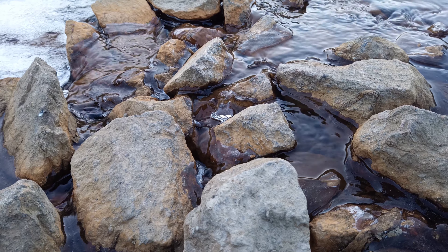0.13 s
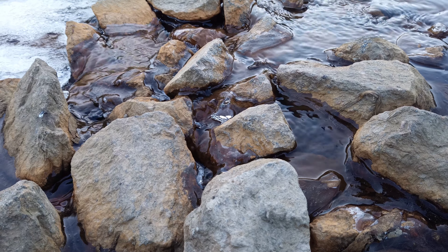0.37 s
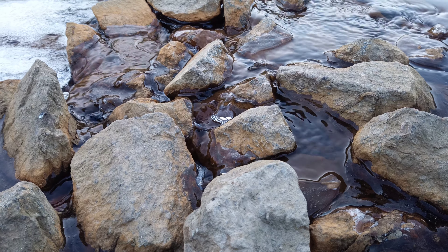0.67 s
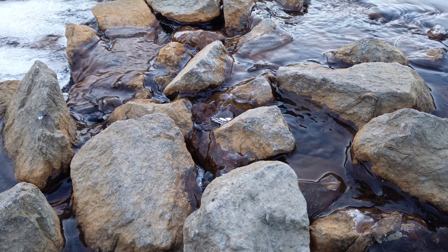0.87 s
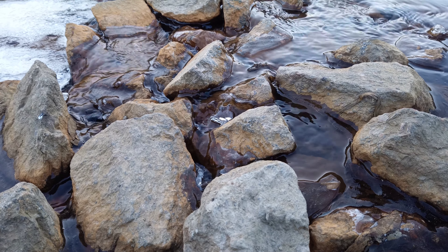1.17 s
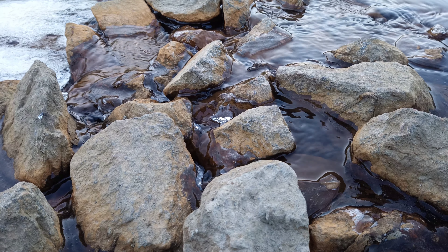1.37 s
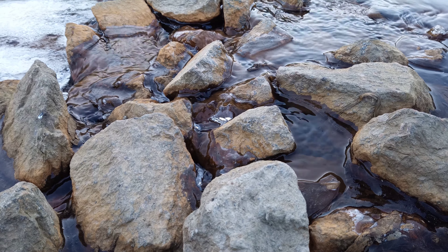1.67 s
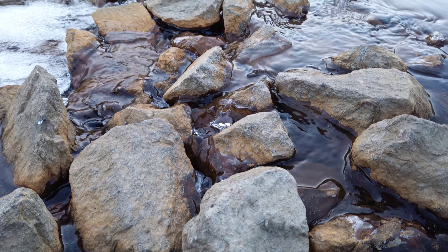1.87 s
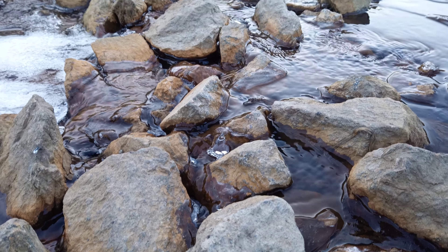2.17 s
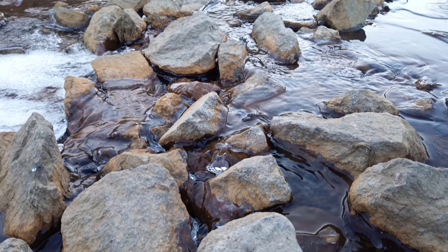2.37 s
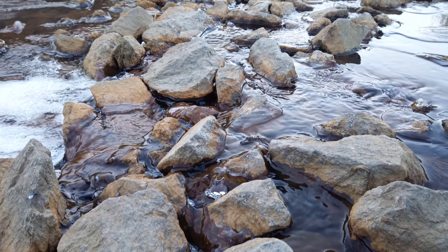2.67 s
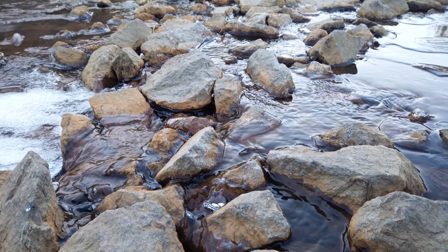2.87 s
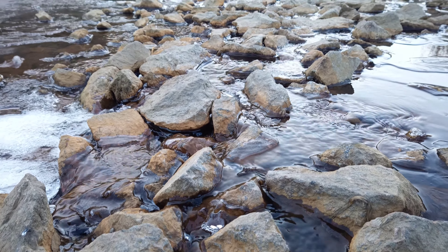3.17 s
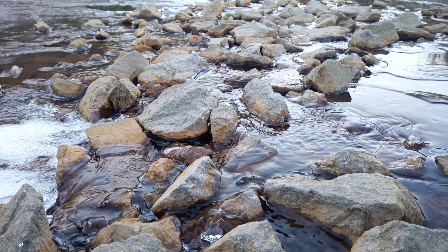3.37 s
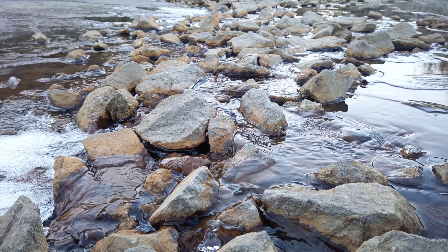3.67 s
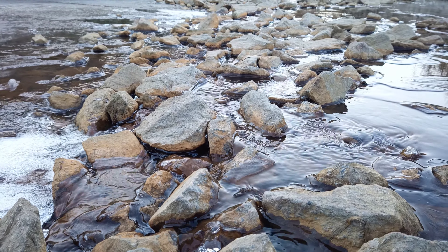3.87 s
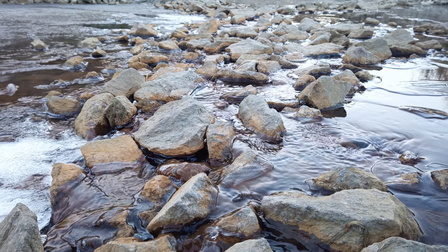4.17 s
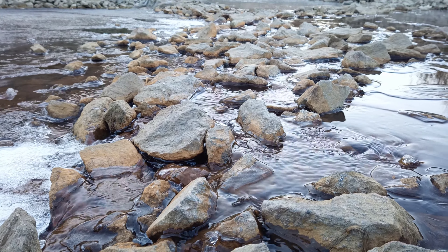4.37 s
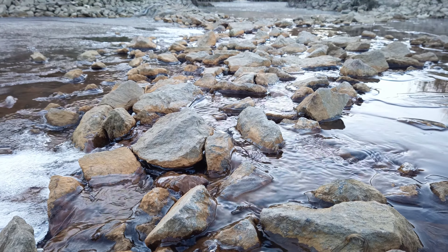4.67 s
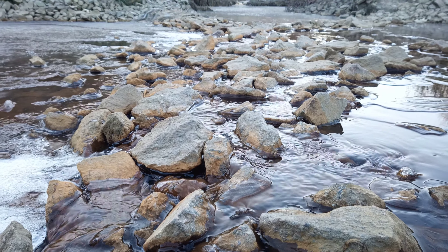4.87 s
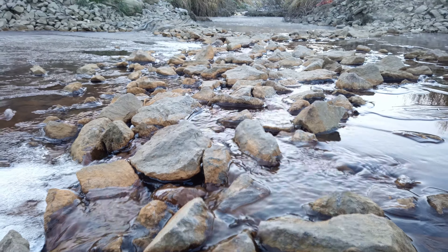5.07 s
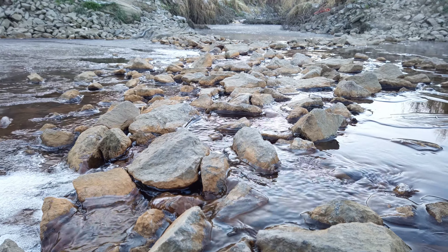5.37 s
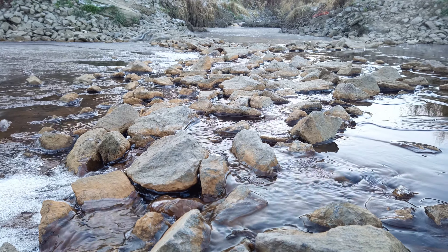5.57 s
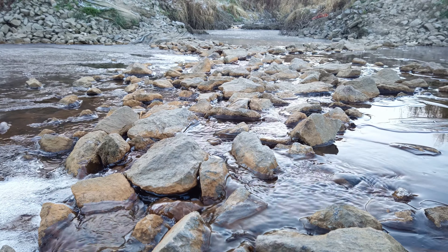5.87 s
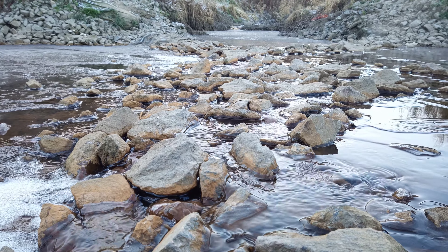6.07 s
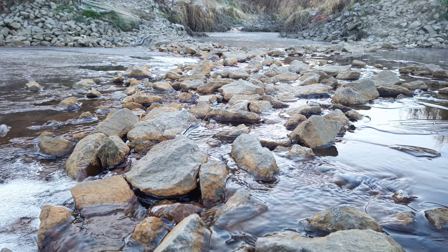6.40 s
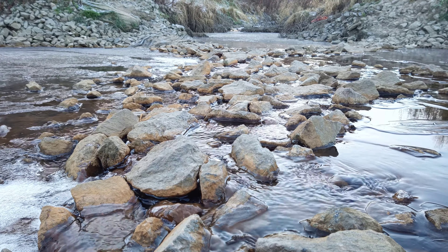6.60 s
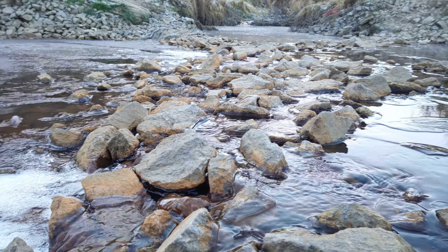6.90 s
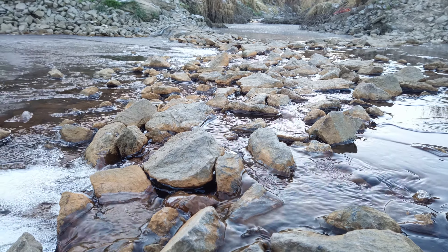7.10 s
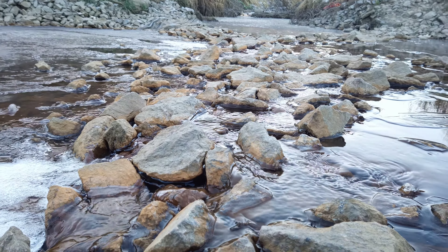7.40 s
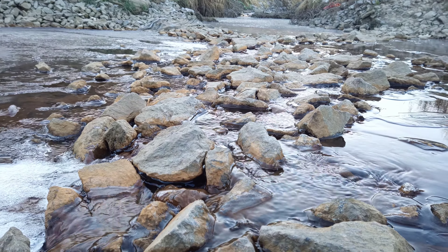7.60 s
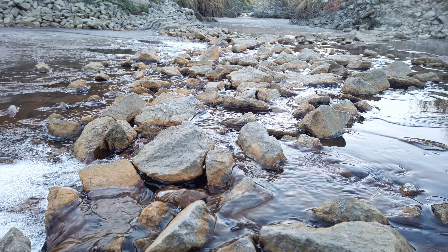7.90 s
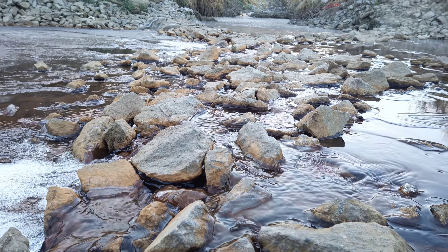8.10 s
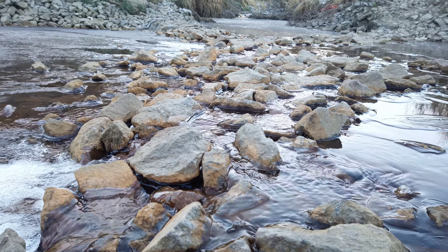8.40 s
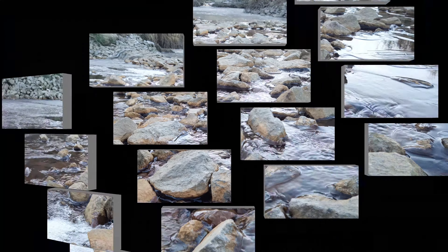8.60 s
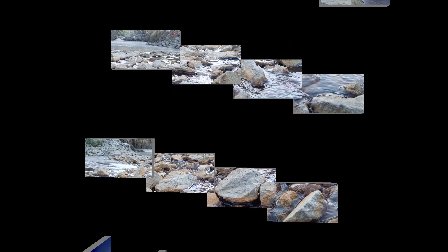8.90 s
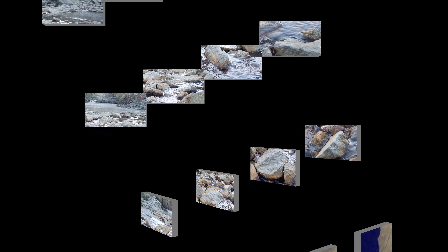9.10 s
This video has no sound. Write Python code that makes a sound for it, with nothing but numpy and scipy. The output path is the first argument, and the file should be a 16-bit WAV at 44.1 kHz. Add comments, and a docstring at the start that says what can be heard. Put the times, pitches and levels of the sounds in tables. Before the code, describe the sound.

Shallow stream gurgles and plops among stones over a low open-air rumble, with finger knocks, then scrapes and sharp snaps on the camera case.

```python
"""On the bank of a shallow stream between stones, a hand holds a camera over a steady low outdoor rumble.
Air bubbles ring as decaying, gliding sines; spray ticks as noise bursts with a tiny bubble in each.
Farther riffles merge into a wash of coloured noise. Fingers knock on the camera case as damped modes.
Later the grip slides over it as noise of uneven slips, and the case snaps as coloured pulses with a brief ring."""
import sys
import numpy as np
from scipy import signal
from scipy.fft import rfft, irfft
from scipy.io import wavfile
from scipy.ndimage import uniform_filter1d

SR = 44100
rng = np.random.default_rng(int(sys.argv[2]) if len(sys.argv) > 2 else 0)


def waveform_to_disk(signal):
    """Save audio, clipped to [-1, 1], as 16-bit WAV at the path in sys.argv[1]."""
    frames = np.transpose(np.atleast_2d(signal))
    scaled = np.clip(frames, -1, 1) * 32767
    samples = np.round(scaled).astype(np.int16)
    wavfile.write(sys.argv[1], SR, samples)


N = 407925
TIME = np.arange(N) / SR


def undb(db):
    """Logarithmic level: decibels become an amplitude gain."""
    return 10 ** (np.asarray(db) / 20)


def level(x, db):
    """Root-mean-square level: scale a signal to a given rms."""
    return x * undb(db) / np.sqrt(np.mean(x ** 2))


def octaves():
    """Logarithmic pitch: the base-2 logarithm of each spectral frequency in Hz."""
    return np.log2(np.maximum(np.fft.rfftfreq(N, 1 / SR), 1))


def colour(x, points):
    """Spectral shaping: filter by (frequency_hz, level_db) points with steep outer skirts; rms 1."""
    hz, db = np.transpose(points)
    octave, knots = octaves(), np.log2(hz)
    outside = np.abs(octave - np.clip(octave, knots[0], knots[-1]))
    gain_db = np.interp(octave, knots, db) - 20 * outside  # skirts fall 20 dB per octave
    return level(irfft(rfft(x) * undb(gain_db), N), 0)


def walk(rate):
    """Slow random modulation: levels held for 1 / rate seconds and slewed; rms 1."""
    hold = int(SR / rate)
    steps = np.repeat(rng.standard_normal(N // hold + 1), hold)
    return level(uniform_filter1d(steps, hold)[:N], 0)


def add(out, s, sound):
    """Superposition: mix a short sound in at a time in seconds."""
    i = max(int(s * SR), 0)
    out[i:i + len(sound)] += sound[:max(N - i, 0)]


# spectrum of the open-air rumble: frequency_hz, relative_level_db
RUMBLE = [(15, -66), (25, -30), (32, -24.5), (40, -20), (52, -4), (64, 0.5), (81, -6), (102, -2.5),
          (145, -2), (188, -6), (220, -5.5), (326, -15), (503, -19), (634, -32), (800, -38.5),
          (1040, -59.5), (1760, -120)]
RUMBLE_DB = -32.5


def rumble():
    """Coloured noise and a narrow band: the low roar of the open air, with a faint distant drone in it."""
    roar = colour(rng.standard_normal(N), RUMBLE) * undb(RUMBLE_DB + 0.4 * walk(2.7))
    drone_hz, width_hz = 77.5, 8
    phase = 2 * np.pi * drone_hz * TIME
    # two slow random envelopes in quadrature
    drone = walk(width_hz) * np.cos(phase) + walk(width_hz) * np.sin(phase)
    return roar + level(drone, -39.5)


def bubble(hz, t60, glide, onset_cycles):
    """Volume resonance of trapped air: it swells smoothly and rings; with positive glide its pitch climbs."""
    t = np.arange(int(t60 * SR) + 16) / SR
    cycles = hz * (t + glide * t ** 2 / (2 * t60))  # glide is the fractional change of pitch over t60
    swell = (1 - np.exp(-(cycles / onset_cycles) ** 2)) * np.exp(-np.log(1000) * t / t60)
    return swell / swell.max() * np.sin(2 * np.pi * cycles)


RING_SPREAD_OCT = 1.0  # how far ring times in a swarm stray from the usual, either way


def swarm(rate, low_hz, high_hz, cycles, onset_cycles, spread_db, bunch_db):
    """Many independent resonators: mostly faint bubbles, in bunches of like size as wavelets fold over stones."""
    odds = np.cumsum(undb(bunch_db * walk(14)))
    out, usual_size = np.zeros(N), walk(12)
    for when, size, loud, ring, rise in rng.random((int(rate * N / SR), 5)):
        db = -spread_db * np.log(.03 + loud)
        i = np.searchsorted(odds, when * odds[-1])
        hz = low_hz * (high_hz / low_hz) ** ((usual_size[i] / 2 + .7 * size) % 1)
        t60 = cycles * 2 ** (RING_SPREAD_OCT * (2 * ring - 1)) / hz
        add(out, i / SR, undb(db) * bubble(hz, t60, .1 * (rise - .4), onset_cycles))
    return out


# how hard the water churns in the pools: time_s, relative_level_db of the large bubbles
CHURN = [(0.15, -56), (0.5, -65), (0.8, -55.5), (1.05, -65.5), (1.3, -57.5), (1.8, -62.5), (2.4, -58),
         (3.1, -61.5), (3.5, -59), (3.85, -67.5), (4.4, -60), (5.2, -58), (6.0, -64.5), (6.7, -57),
         (8.1, -63), (8.8, -56.5), (9.2, -58)]
# spectrum of the large bubbles: frequency_hz, relative_level_db
GURGLE = [(600, -10), (880, -7.5), (1180, -0.5), (1360, -5.5), (1470, -3.5), (1600, -3.5), (1740, -3.5),
          (2000, -2.5), (2300, -10.5), (3000, -12.5), (3800, -18)]


def gurgle():
    """Resonance of large bubbles: a dense low swarm whose level follows the churning of the pools."""
    bubbles = swarm(900, low_hz=748.0, high_hz=3392, cycles=44, onset_cycles=4.9, spread_db=5.5, bunch_db=4.5)
    churn_s, churn_db = np.transpose(CHURN)
    return colour(bubbles, GURGLE) * undb(np.interp(TIME, churn_s, churn_db) + 0.5)


# wavelets that spill over a stone and shed extra small bubbles: middle_s, half_length_s, rise_db
SPILLS = [(0.886, 0.09, 8.5), (1.697, 0.14, 5), (4.56, 0.28, 8), (5.204, 0.1, 5.5), (5.742, 0.037, 19),
          (9.17, 0.045, 12.5)]


def spill_rise_db():
    """Superposed bell-shaped rises: the extra small-bubble level as wavelets spill over."""
    return sum(db * np.exp(-((TIME - s) / half_length) ** 2) for s, half_length, db in SPILLS)


# spectrum of the small bubbles: frequency_hz, relative_level_db
FIZZ = [(2500, -22.5), (3500, 0), (4800, 1.5), (6200, 5), (7000, -5), (8000, -16.5)]
FIZZ_DB = -76.5  # in the steady flow


def fizz(spill_db):
    """Resonance of small bubbles: a higher swarm, louder as wavelets spill over."""
    bubbles = swarm(350, low_hz=2763, high_hz=7470, cycles=50, onset_cycles=10, spread_db=8.0, bunch_db=4.5)
    return colour(bubbles, FIZZ) * undb(FIZZ_DB + spill_db)


# spectrum of the tiniest bubbles and fine spray: frequency_hz, relative_level_db
SPARKLE = [(6200, 3), (8000, -11), (9800, -8), (11200, 0.5), (13000, -24.5), (15000, -8)]


def sparkle():
    """Small cavities ring high and briefly: the tiniest bubbles burst in a few milliseconds."""
    bursts = swarm(120, 8000, 14000, cycles=50, onset_cycles=9, spread_db=9.5, bunch_db=4)
    return colour(bursts, SPARKLE) * undb(-83)


# spectrum of the distant riffles: frequency_hz, relative_level_db
WASH = [(400, -9), (540, 5), (700, 4), (1000, -5), (1400, -13), (2000, -19.5), (2500, -22.5), (4200, -29.5),
        (6200, -26.5), (8000, -39.5), (11000, -36), (13800, -38.5), (15200, -27)]
FAR_FIZZ_DB = -79.5  # small bubbles too far off to be told apart


def wash(spill_db):
    """Incoherent summation: many distant bubbles merge into coloured noise."""
    riffles = colour(rng.standard_normal(N), WASH) * undb(-58.2 + 1.2 * walk(11))
    far_db = FAR_FIZZ_DB + .7 * spill_db + 2.0 * walk(23)
    return riffles + colour(rng.standard_normal(N), FIZZ) * undb(far_db)


RING_S, RING_SLOPE = 0.046, 1  # t60 of a 1 kHz bubble; smaller bubbles die sooner, by this power of pitch


def ring_time(hz):
    """Damping law: seconds for a bubble of this pitch to die away by 60 dB."""
    return RING_S * (hz / 1000) ** -RING_SLOPE


# lesser bubbles that break off a plop: full spread of pitch (ratio), spread in time, relative strength
SPLIT_RATIO, SPLIT_S, SPLIT_DB = .45, 0.028, -16.5


def plop(hz, db, count=3):
    """Fragmentation: a main bubble rings with shorter-lived lesser ones; small bubbles shed less."""
    out = np.zeros(SR // 2)
    add(out, 0, undb(db) * bubble(hz, ring_time(hz), glide=0.054, onset_cycles=2.6 * hz / 1000))
    for late, size, loud in rng.random((count, 3)):
        lesser_hz = hz * (1 + SPLIT_RATIO * (size - .5))
        gain = undb(db + SPLIT_DB) * (.5 + loud) * (1 - .5 * late) * np.sqrt(1000 / hz)
        lesser = bubble(lesser_hz, .5 * ring_time(lesser_hz), glide=.1, onset_cycles=5)
        add(out, SPLIT_S * late, gain * lesser)
    return out


# the nearest plops: start_s, pitch_hz, level_db (peak of the main bubble, before echoes)
PLOPS = [(0.009, 1900, -41), (0.59, 3560, -48), (0.598, 2340, -49), (0.707, 1480, -43),
         (0.789, 2840, -36.5), (1.203, 1730, -44.5), (1.254, 1700, -44), (1.258, 1273, -40.5),
         (1.409, 2060, -41.5), (1.742, 1760, -44.5), (1.838, 1965, -42), (1.839, 1195, -33),
         (1.938, 1930, -39.5), (2.098, 2880, -45), (2.292, 1910, -40.5), (2.384, 4830, -39),
         (2.429, 4940, -51.5), (2.623, 4470, -46.5), (3.194, 4920, -48.5), (3.762, 3680, -49.5),
         (3.974, 2740, -45.5), (3.979, 1620, -46.5), (3.999, 6040, -35.5), (4.07, 3290, -46.5),
         (4.071, 4800, -42), (4.158, 1904, -40), (4.243, 1160, -24.5), (4.42, 5400, -47),
         (4.448, 6140, -52), (4.485, 4600, -49.5), (4.514, 1220, -35), (4.514, 1897, -35.5),
         (4.57, 6300, -48), (4.586, 6100, -47), (4.616, 3960, -45), (4.659, 4400, -50), (4.677, 4260, -52),
         (4.703, 5810, -34.5), (4.792, 1730, -43.5), (4.828, 1140, -38.5), (4.863, 1150, -38.5),
         (5.092, 1660, -39), (5.1, 5600, -44.5), (5.202, 1210, -42), (5.615, 2350, -40), (5.676, 1220, -41),
         (5.769, 5890, -34), (5.861, 6300, -41.5), (5.873, 5450, -45), (6.024, 6200, -49.5),
         (6.234, 1690, -44.5), (6.237, 1290, -39.5), (6.291, 6300, -41), (6.4, 5080, -54),
         (6.739, 1376, -42.5), (6.783, 5920, -36.5), (6.866, 1130, -41), (6.866, 1760, -38.5),
         (7.251, 5070, -39.5), (7.328, 1230, -36), (7.335, 1780, -36.5), (7.645, 1720, -41),
         (7.689, 3080, -49), (7.999, 1774, -40.5), (8.212, 2330, -43.5), (8.346, 4400, -43),
         (8.634, 4450, -48), (8.661, 1940, -41), (8.665, 1130, -40), (8.799, 1350, -33.5),
         (8.849, 1125, -33), (8.872, 1180, -38), (8.906, 1120, -37.5), (8.999, 1606, -33),
         (9.057, 1650, -36), (9.149, 1155, -35)]


def plops():
    """Isolated resonators: the nearest bubbles, each heard alone."""
    out = np.zeros(N)
    for s, hz, db in PLOPS:
        add(out, s, plop(hz, db))
    return out


# the nearest droplets of spray: start_s, relative_level_db, pitch_hz
SPRAY = [(0.606, -56.5, 10200), (0.729, -46.5, 10100), (2.329, -52, 7740), (2.551, -59, 10200),
         (2.565, -59, 10700), (3.863, -61, 12000), (4.284, -58.5, 11600), (4.388, -53, 14700),
         (4.556, -60, 10900), (4.617, -63, 10900), (5.029, -58, 9800), (5.114, -49.5, 11400),
         (5.32, -52, 9600), (5.486, -51, 7840), (5.614, -57, 9800), (5.74, -60, 9600), (6.135, -58, 9600),
         (6.175, -54, 10600), (6.977, -55, 11200), (7.645, -52, 11000), (8.634, -49, 12600),
         (8.918, -52.5, 9950)]


def spray_ticks():
    """Impact and resonance: a drop cracks on the surface and leaves a tiny bubble."""
    out, t = np.zeros(N), np.arange(SR // 50) / SR
    for s, db, hz in SPRAY:
        add(out, s, undb(db - 23) * rng.standard_normal(len(t)) * np.exp(-t / 0.0014))
        add(out, s, undb(db) * bubble(hz, t60=0.0055, glide=0.013, onset_cycles=2.2))
    return out * undb(9.0)


SPATTER_PER_S, SPATTER_DB = 22, -84  # bursts of fine spray: rate, least relative level of the random ones
SPATTER_S = 0.0021  # time for a burst to crest
BUBBLE_SPATTER_DB, DROP_SPATTER_DB = -30, -15  # thrown by a 6 kHz bubble and by a drop, relative to the table level


def spatter():
    """Modulated noise: fine spray patters in short bursts, at random and at each near plop and drop."""
    bursts = (rng.random(N) < SPATTER_PER_S / SR) * undb(SPATTER_DB + 18 * rng.random(N) ** 4)
    for s, hz, db in PLOPS:
        bursts[int(s * SR)] += undb(db + BUBBLE_SPATTER_DB) * (hz / 6000) ** 2
    for s, db, hz in SPRAY:
        bursts[int(s * SR)] += undb(db + DROP_SPATTER_DB)
    t = np.arange(SR // 20) / SR
    fall = signal.fftconvolve(bursts, t / SPATTER_S * np.exp(1 - t / SPATTER_S))[:N]
    grit = rng.standard_normal(N) * undb(4 * walk(900))
    return fall * (colour(grit, SPARKLE) + undb(1.5) * colour(grit, FIZZ))


def among_stones(x, echo_db, t60):
    """Diffuse reflection: the direct sound is joined by duller, decaying echoes from many wet stone faces."""
    t = np.arange(SR // 8) / SR
    echoes = rng.standard_normal(len(t)) * np.exp(-np.log(1000) * t / t60) * (t > .002)
    dull = signal.butter(1, 6500, fs=SR)
    response = signal.lfilter(*dull, echoes / np.linalg.norm(echoes))
    return x + undb(echo_db) * signal.fftconvolve(x, response)[:N]


def stream():
    """Superposition by distance: pools and near drops echo among the stones; wash and fine spray do not."""
    spill_db = spill_rise_db()
    pools = among_stones(gurgle() + fizz(spill_db), echo_db=-4.0, t60=0.06)
    near = among_stones(plops() + spray_ticks(), echo_db=-10.5, t60=0.081)
    return wash(spill_db) + spatter() + sparkle() + pools + near


def click(points):
    """Impulse response: one sharp pulse of a given colour, 6 ms long, scaled by its peak."""
    half = SR * 3 // 1000
    pulse = colour(signal.unit_impulse(N, N // 2), points)[N // 2 - half:N // 2 + half]
    return pulse * np.hanning(len(pulse)) / np.abs(pulse).max()


CATCHES_PER_S, CATCH_DB = 27, 23  # sharper catches of the skin; height of each above the fine slips


def slips():
    """Stick-slip friction: dense tiny slips of uneven strength, with a sharper catch now and then."""
    catches = (rng.random(N) < CATCHES_PER_S / SR) * undb(CATCH_DB)
    return rng.standard_normal(N) * (undb(2.8 * walk(1100) + walk(90)) + catches)


# finger knocks on the case: start_s, relative_level_db, thud_pitch_hz, case_overtone_db
KNOCKS = [(2.409, -30.5, 806, -6), (2.4414, -29, 836, 2), (2.458, -28, 806, 12), (2.565, -24.5, 800, 4),
          (2.616, -30, 740, -6), (2.688, -29.5, 890, -8), (2.703, -21, 825, -10), (2.7279, -25.5, 710, 6),
          (2.86, -32, 830, -6), (2.875, -17.5, 830, 1), (2.8915, -18, 870, -1), (3.1431, -23, 850, -5),
          (3.1562, -16, 845, -0.5), (3.3299, -19, 830, 4), (3.3424, -16, 853, 1.5), (4.7405, -21, 900, 5.5),
          (4.7793, -32, 750, 2), (5.0356, -15.5, 1010, -2), (5.1181, -20, 830, 8), (5.1275, -13.5, 834, 3),
          (5.6031, -15, 1016, -8)]
# spectrum of the ringing microphone port: frequency_hz, relative_level_db
PORT = [(2800, -21.5), (3500, -7.5), (3850, -13.5), (4500, -10), (5200, -14.5), (5800, -1.5), (6600, 0.5),
        (7400, -15), (8200, -26.5)]
# spectrum of skin rubbing the case: frequency_hz, relative_level_db
RUB_LOW = [(400, 10.5), (800, 8), (1400, 3.5), (2000, -0.5), (2900, -7), (3500, -9.5), (4100, -32),
           (6000, -29)]
CASE_HZ, PORT_TICK_DB = 2810, -31  # overtone of the case; port tick relative to a knock
# a firmer knock is brighter: overtones in dB per octave at a reference level, and their rise per dB
HARDNESS_DB, FIRM_DB, HARDENING = -12, -10, 0.34


def knocks():
    """Damped modal vibration: a soft fingertip gives a hollow thud, two overtones, a port tick and a rattle."""
    out, t, port = np.zeros(N), np.arange(SR // 40) / SR, click(PORT)
    grit, rattle_db, rattle_s = colour(slips(), RUB_LOW), -29, .005
    for s, db, thud_hz, case_db in KNOCKS:
        hardness_db = HARDNESS_DB + HARDENING * (db - FIRM_DB)
        # pitch in Hz, relative level in dB, decay time constant in s
        modes = [(thud_hz, 0, .00046), (1.925 * thud_hz, 0, .00056), (CASE_HZ, case_db, .00058)]
        for k, (hz, mode_db, tau) in enumerate(modes):
            crest = 3 * tau
            swell = (t / crest * np.exp(1 - t / crest)) ** 3
            gain = undb(db + mode_db + hardness_db * np.log2(hz / thud_hz))
            # neighbouring modes push in opposite directions and leave gaps between them
            sign = -(-1) ** k
            add(out, s - .0001, sign * gain * swell * np.cos(2 * np.pi * hz * (t - crest)))
        add(out, s - len(port) / 2 / SR, undb(db + PORT_TICK_DB + .5 * case_db) * port)
        rattle = grit[int(s * SR):][:len(t)] * np.exp(-t / rattle_s) * (1 - np.exp(-t * thud_hz)) ** 2
        add(out, s, undb(db + rattle_db) * rattle)
    return out * undb(-0.8)


# snaps and ticks of the case: start_s, body_relative_level_db, port_relative_level_db, thud_level_db
SNAPS = [(4.3887, -33.5, -37, -70), (6.9444, -44, -32, -55), (7.0975, -25.5, -48, -56),
         (7.1724, -39, -41, -50), (7.3907, -10, -8.5, -15.5), (7.5197, -9, -18.5, -14),
         (7.7671, -27.5, -51, -44), (7.7717, -29, -51, -44), (8.416, 4.5, 5, -31), (8.5124, -46, -39, -55),
         (8.5315, -46, -29.5, -46)]
# spectrum of the cracking body: frequency_hz, relative_level_db
CRACK = [(200, -6.5), (650, 11), (1300, 11.5), (2300, 15), (3100, 4.5), (3600, -8.5), (4200, -32)]
# brief ring of the shell, low thud then higher ring: pitch_hz, level_db relative to thud or body, t60_s
SHELL = [(642, 1.5, 0.013), (2500, -19, 0.019)]


def snaps():
    """Sudden release of strain: the microphone port rings first, then the shell, which rebounds once."""
    out, body, port = np.zeros(N), click(CRACK), click(PORT)
    lead_s, rebound_s, rebound_db = .0005, .0022, -12
    t = np.arange(SR // 40) / SR
    thud, ring = [undb(db - 60 * t / t60) * np.sin(2 * np.pi * hz * t) for hz, db, t60 in SHELL]
    for s, body_db, port_db, thud_db in SNAPS:
        add(out, s, undb(body_db) * ring + undb(thud_db) * thud)
        start = s - len(body) / 2 / SR
        for delay, db in [(0, 0), (rebound_s, rebound_db)]:
            add(out, start + delay, -undb(body_db + db + 2.0) * body)
            add(out, start + delay - lead_s, undb(port_db + db + 0.5) * port)
    return out


def stroke(s, length, attack_s, release_s):
    """Sliding speed as envelope: the skin speeds up, slides for a while and comes to rest."""
    attack = np.clip((TIME - s) / attack_s + 1, 0, 1)
    return attack ** 2 * np.exp(-np.clip((TIME - s - length) / release_s, 0, 20))


def shifting(x):
    """Independent band modulation: the contact point wanders, so each part of the spectrum comes and goes."""
    octave, spectrum = octaves(), rfft(x)
    centres = np.arange(9.5, 13.1, .7)  # log2 of Hz
    bands = (irfft(spectrum * np.interp(octave, centres, row), N) for row in np.eye(len(centres)))
    return sum(band * undb(2.5 * walk(55)) for band in bands)


# strokes of the grip over the case (full speed from start_s, after the attack):
# start_s, length_s, attack_s, rub_level_db, port_hiss_level_db, scuff_level_db
STROKES = [(5.111, .012, 0.025, -44.5, -60, -68), (6.937, 0.037, 0.061, -42.5, -61, -53.5),
           (7.0, .04, 0.044, -48.5, -66, -55.5), (7.054, 0.15, 0.07, -48.5, -56, -50.5),
           (7.13, 0.034, 0.065, -61, -59, -49), (7.22, 0.036, 0.055, -52, -50.5, -51.5),
           (7.286, 0.064, .04, -55, -55.5, -57.5), (7.397, 0.054, 0.045, -51, -52.5, -53.5),
           (7.498, 0.028, 0.068, -39.5, -45.5, -49), (7.546, 0.043, 0.038, -45.5, -54, -54.5),
           (7.755, 0.009, 0.033, -36, -55, -70), (7.786, 0.024, .03, -59, -59.5, -64),
           (8.366, 0.11, 0.093, -51, -63, -58), (8.492, 0.05, 0.078, -39, -54.5, -62),
           (8.58, 0.062, .05, -52.5, -65, -74), (8.774, 0.032, 0.047, -47, -60.5, -71.5),
           (8.901, 0.014, 0.027, -50, -65.5, -69)]
# spectrum of the hiss in the microphone port: frequency_hz, relative_level_db
RUB_HIGH = [(4800, -6.5), (5500, 0.5), (5900, 6.5), (6450, 2.5), (7200, -13), (8200, -28), (13500, -34.5),
            (15200, -21)]
# spectrum of the scuff across the port opening: frequency_hz, relative_level_db
SCUFF = [(2500, 6), (4000, 0.5), (6500, 3.5), (7500, -9.5), (8500, -22.5), (13500, -29), (15200, -18.5)]
RUB_RELEASE_S, HISS_RELEASE_S = 0.017, 0.04


def slides():
    """Friction noise: skin rubs the case, rings the microphone port and scuffs its opening; pressure flutters."""
    out = 0
    layers = [(RUB_LOW, RUB_RELEASE_S), (RUB_HIGH, HISS_RELEASE_S), (SCUFF, RUB_RELEASE_S)]
    for k, (points, release_s) in enumerate(layers):
        # overlapping strokes add in power
        power = sum((undb(db[k]) * stroke(s, length, attack_s, release_s)) ** 2
                    for s, length, attack_s, *db in STROKES)
        out = out + colour(shifting(slips()), points) * np.sqrt(power)
    return out


# the skin sticks and slips quickly on the case: start_s, length_s, level_db (typical peak of a slip)
CREAKS = [(6.921, 0.054, -41.5), (7.75, .024, -48), (8.495, 0.054, -45)]
CREAK_PER_S, CREAK_S = 300, 0.00095  # slips a second; each crests at half this time, then fades


def creaks():
    """Stick-slip excitation: quick, uneven slips of the skin each ring near the overtone of the case."""
    out, t = np.zeros(N), np.arange(SR // 100) / SR
    swell = t / CREAK_S * np.exp(1 - 2 * t / CREAK_S)  # crests at one half
    for s, length, db in CREAKS:
        draws = rng.random((40, 3))[:int(length * CREAK_PER_S)]
        for k, (late, size, pitch) in enumerate(draws):
            ring = swell * np.sin(2 * np.pi * CASE_HZ * (.88 + .24 * pitch) * t)
            add(out, s + (k + .5 * late) / CREAK_PER_S, 2 * undb(db) * (.5 + size) * ring)
    return out


def scene():
    """Superposition: open air, water and the hand on the camera, as one channel."""
    return (rumble() + stream() + knocks() + snaps() + slides() + creaks())[None]


LOW_CUT_HZ, TOP_HZ = 12, 15800


def record(dry):
    """Peak limiting and band limiting: the level ducks briefly after peaks over the ceiling; both extremes are cut."""
    ceiling, release_s = undb(-1.8), 0.048
    over = np.maximum(np.abs(dry[0]) / ceiling, 1)
    # the logarithmic reduction jumps to each peak and fades exponentially
    fade = TIME / release_s
    reduction = np.exp(np.maximum.accumulate(np.log(np.log(over) + 1e-12) + fade) - fade)
    low_cut = signal.butter(2, LOW_CUT_HZ, "highpass", fs=SR, output="sos")
    limited = signal.sosfilt(low_cut, dry * np.exp(-reduction))
    return signal.sosfilt(signal.ellip(8, .2, 70, TOP_HZ, fs=SR, output="sos"), limited)


dry = scene()
out = record(dry)
waveform_to_disk(out)
```